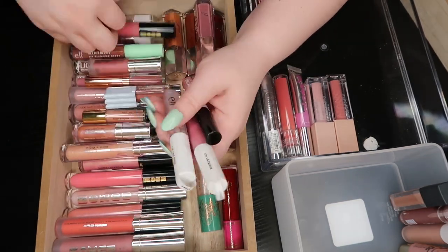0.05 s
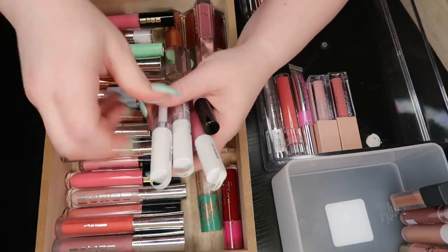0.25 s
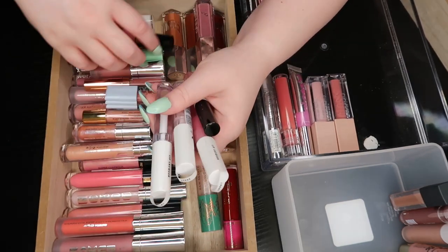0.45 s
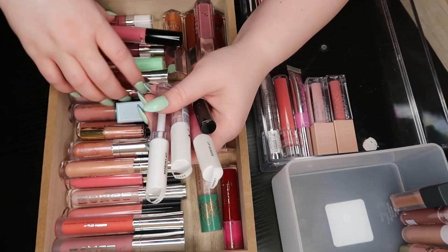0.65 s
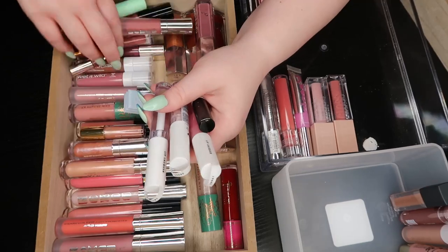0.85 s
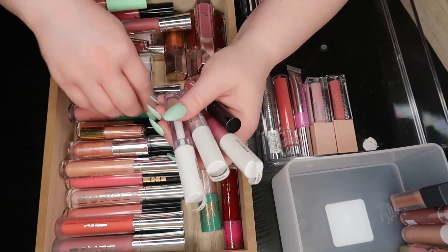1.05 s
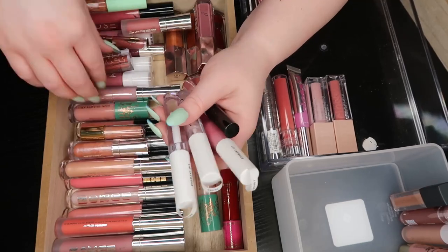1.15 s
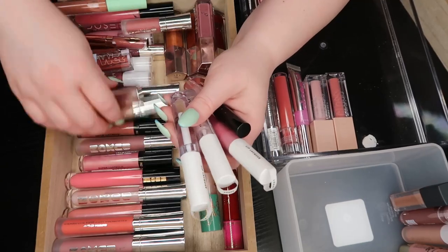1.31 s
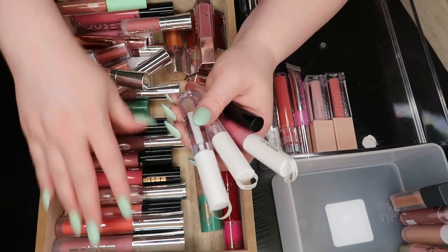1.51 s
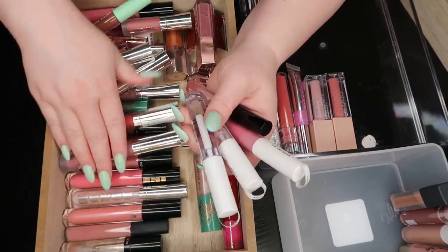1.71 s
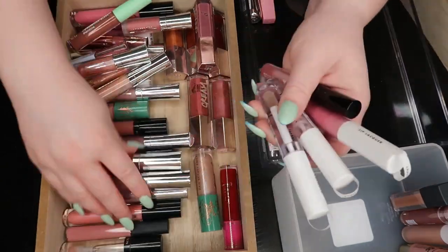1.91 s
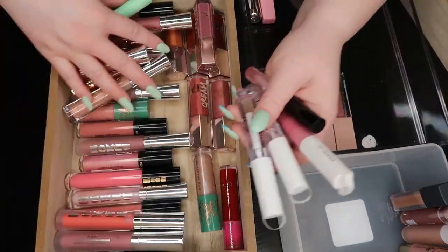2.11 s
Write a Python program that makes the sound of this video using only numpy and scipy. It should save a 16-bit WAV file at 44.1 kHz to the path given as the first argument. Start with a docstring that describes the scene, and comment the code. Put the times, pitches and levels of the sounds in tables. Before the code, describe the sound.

Close up in a small room, plastic lip gloss tubes clack against each other and a wooden drawer. The bright clicks start sparse, then come in uneven bursts with short slides between them, while a low electrical hum lies underneath.

```python
"""In a small room, close to the microphone, hands rummage through a wooden drawer of plastic lip gloss tubes.
Each impact excites damped modes: a bright tick, a few milliseconds of ring in a tube's wall and a knock
on the drawer. Between impacts the tubes slide and scrape by stick-slip friction, and now and then a loose
one rings on. A wavering electrical hum and a faint rumble lie underneath."""
import sys
import numpy as np
from scipy import signal
from scipy.fft import rfft, irfft, next_fast_len
from scipy.io import wavfile
from scipy.ndimage import uniform_filter1d

SR = 44100
rng = np.random.default_rng(int(sys.argv[2]) if len(sys.argv) > 2 else 0)


def to_wav(s):
    """Save 16-bit WAV."""
    ch = np.atleast_2d(s).T  # columns
    pcm = np.round(np.clip(ch, -1, 1) * 32767)  # PCM
    wavfile.write(sys.argv[1], SR, pcm.astype(np.int16))


N = 95608


def clacks():
    """Inelastic collision: each impact is followed by a weaker rebound from the same spot."""
    # (time [s], knock level [dB], tube level [dB], tick level [dB], tube pitch [Hz], tick pitch [Hz])
    impacts = [(0.0282, -33, -29, -33, 6500, 14200), (0.0411, -30, -26.5, -31.5, 4800, 9600),
               (0.0448, -30, -24.5, -29.5, 4320, 9200), (0.0622, -37, -34, -38, 4380, 8800),
               (0.107, -32, -26.5, -35.5, 4300, 9200), (0.1503, -71, -38, -21, 6770, 14200),
               (0.2037, -67, -49, -43, 5700, 9700), (0.2256, -45, -38, -50, 3720, 11000),
               (0.277, -46.5, -38.5, -52, 3800, 9200), (0.339, -61, -37, -35, 4480, 11100),
               (0.4028, -30.5, -34, -40, 3480, 13600), (0.4089, -40, -31.5, -38, 4300, 9500),
               (0.4346, -29.5, -32.5, -32, 4100, 9200), (0.4447, -44, -35, -31, 4080, 9300),
               (0.4597, -44, -33, -29.5, 6340, 10700), (0.4638, -31.5, -29, -29.5, 4300, 8500),
               (0.4834, -38, -31.5, -41, 5250, 8800), (0.5354, -35, -33, -34, 4230, 8900),
               (0.5407, -30, -29.5, -34, 5760, 8600), (0.552, -29, -26.5, -39, 5240, 12500),
               (0.5603, -27.5, -31, -28, 6100, 10800), (0.5728, -43, -45, -33, 5660, 13000),
               (0.5848, -37, -33, -45, 4200, 10400), (0.5864, -38, -26, -43, 6160, 10400),
               (0.5943, -20.5, -20, -13, 4670, 12100), (0.6312, -36, -38, -37, 4300, 9600),
               (0.636, -45, -31, -45, 5270, 13700), (0.64, -24.5, -32, -40, 5200, 10700),
               (0.659, -20, -18, -21.5, 4300, 13600), (0.6642, -23.5, -20, -21, 4230, 14300),
               (0.6746, -30, -25, -42, 3140, 13600), (0.7081, -23.5, -20.5, -24.5, 5570, 10400),
               (0.7145, -22.5, -29, -33, 3570, 10200), (0.7213, -29, -25, -18, 5000, 13600),
               (0.7256, -21.5, -19, -18, 6140, 13700), (0.729, -23, -20, -24, 4400, 9700),
               (0.7305, -38, -19, -31, 5300, 10000), (0.751, -32, -25.5, -23.5, 6800, 10900),
               (0.768, -28, -28, -26, 5440, 10500), (0.7764, -26, -19.5, -23.5, 4080, 9000),
               (0.8125, -22, -16, -18, 4520, 9000), (0.8147, -22, -22, -37, 4370, 9200),
               (0.8219, -24.5, -23, -39, 4550, 9200), (0.8255, -28, -18, -31, 7100, 9200),
               (0.839, -25, -16, -22, 7050, 9800), (0.863, -37, -26.5, -31, 4800, 10900),
               (0.8818, -35, -24, -33, 5170, 10200), (0.8889, -26.5, -17, -22.5, 4410, 9100),
               (0.947, -36, -31, -49, 5070, 9600), (0.9682, -27, -38, -39, 4200, 10100),
               (0.9803, -30, -42, -49, 4400, 9200), (1.0076, -41, -38.5, -31.5, 6260, 14600),
               (1.0464, -27, -26, -44, 4370, 9100), (1.0514, -42, -57, -31, 4260, 9500),
               (1.1003, -27.5, -21, -29, 5450, 9300), (1.1045, -29, -23, -41, 4700, 10600),
               (1.1086, -23.5, -21, -24.5, 6540, 8500), (1.1142, -27, -17, -26, 4460, 10100),
               (1.2028, -38.5, -47, -43, 4400, 13900), (1.2306, -32.5, -27.5, -36, 3560, 9000),
               (1.2589, -24, -24, -33, 4160, 10100), (1.2696, -26.5, -19, -19.5, 4080, 9300),
               (1.293, -15.5, -14, -30, 4250, 10300), (1.2983, -23.5, -16.5, -18.5, 4340, 9700),
               (1.3077, -16.5, -12.5, -20, 4215, 8700), (1.3115, -36, -19, -24, 4300, 15000),
               (1.3221, -38, -25, -33, 5250, 8900), (1.328, -49, -30, -29, 5400, 9000),
               (1.341, -57, -29.5, -33, 6100, 8650), (1.3697, -39, -30, -42, 4750, 9500),
               (1.3902, -30.5, -33, -32.5, 4370, 13300), (1.4459, -40, -38.5, -43.5, 5570, 9400),
               (1.4687, -41, -43.5, -62, 3400, 9300), (1.5312, -49, -42, -34, 6500, 13400),
               (1.5353, -30.5, -27, -38, 3200, 11300), (1.5488, -37.5, -29, -39, 5900, 8800),
               (1.5628, -24.5, -17, -36, 5150, 9000), (1.5764, -20, -17, -14, 4950, 9500),
               (1.5855, -24, -18, -19, 5560, 9800), (1.6079, -25.5, -18.5, -18.5, 5800, 9500),
               (1.6106, -21.5, -17.5, -17.5, 5240, 9700), (1.6298, -26, -16.5, -17.5, 5700, 9500),
               (1.638, -44, -28, -26, 5300, 9300), (1.6419, -17, -31, -27, 6140, 10700),
               (1.6465, -18.5, -21, -18, 4240, 9500), (1.65, -31, -17.5, -19, 4900, 12800),
               (1.657, -36, -17, -16.5, 7670, 12400), (1.6612, -20, -14.5, -25, 6230, 10100),
               (1.666, -19.5, -19, -25, 5150, 9800), (1.669, -32, -18, -27, 4130, 10500),
               (1.6741, -46, -22, -30, 7000, 9000), (1.6847, -43, -26, -54, 3670, 9900),
               (1.6896, -23, -14, -21, 4090, 9500), (1.7022, -30, -22, -32, 6420, 10800),
               (1.7269, -33, -37, -54, 6100, 8800), (1.7309, -43, -28.5, -36.5, 5540, 9100),
               (1.8213, -32.5, -33, -51, 3740, 9400), (1.8315, -27.5, -22, -47, 3780, 8700),
               (1.844, -31, -19.5, -34, 6270, 10000), (1.8541, -25.5, -16, -17, 4000, 9100),
               (1.8745, -24, -20.5, -19, 3600, 9200), (1.8787, -26.5, -24, -37, 3380, 9600),
               (1.8931, -27, -27, -25, 6600, 9700), (1.9021, -26, -24, -19, 5300, 8540),
               (1.9175, -21.5, -23.5, -21, 4160, 8500), (1.9202, -22, -22, -22, 5000, 9500),
               (1.9233, -35, -21.5, -24, 3670, 10300), (1.952, -21.5, -27, -21, 5050, 11000),
               (1.9558, -22, -19, -17.5, 6460, 14000), (1.9743, -27, -22, -28, 5470, 9200),
               (1.979, -24.5, -19, -33, 3980, 9200), (1.9841, -23, -20, -25, 4920, 9000),
               (1.9933, -26.5, -19, -27, 4400, 11200), (2.0065, -28, -19, -36, 4730, 9600),
               (2.0173, -29.5, -33, -33, 4670, 10200), (2.0267, -30, -31.5, -38, 5200, 9550),
               (2.0405, -37, -32.5, -44, 4600, 9500), (2.1133, -46.5, -33.5, -43, 6730, 10700),
               (2.1312, -42, -36.5, -40, 5150, 12800), (2.1501, -45, -42, -31, 5300, 13600),
               (2.1551, -36, -30, -42, 3930, 10000), (2.1599, -29, -23, -31.5, 5240, 9700)]
    # resonances of the drawer (frequency [Hz], relative level [dB], T60 [s])
    drawer_modes = [(444.7, -13, 0.19), (824, -11.5, 0.073), (878, -5.5, 0.044), (967, -7.5, 0.046),
                    (1018, -3, 0.019), (1266, -3.5, 0.039), (1327, -4.5, 0.026), (1558, 2, 0.03),
                    (1905, -13, 0.081), (2156, -4, 0.033), (2310, -5.5, 0.067)]
    # the knock's low band, light on the pile, fuller on the wood (time [s], relative gain [dB])
    knock_body = [(.1, 1), (.82, -4), (1.3, 0), (1.9, 3.5)]
    t = np.arange(SR // 14) / SR
    out = np.zeros(N + SR)
    modes = np.array([undb(db) * ring(t, hz, t60) for hz, db, t60 in drawer_modes])
    for (at, *blow), path in zip(impacts, room_paths(len(impacts))):
        body_db = np.interp(at, *np.array(knock_body).T)
        sound = np.pad(contact(t, modes, body_db, *blow), (0, len(t)))
        gap_s = rng.uniform(0.0018, 0.005)
        rebound_db = rng.uniform(-11.44, -9)
        add(sound, undb(rebound_db) * contact(t, modes, body_db, *blow), gap_s)
        add(out, signal.fftconvolve(sound, path), at)
    return out[:N]


def contact(t, modes, body_db, knock_db, tube_db, tick_db, tube_hz, tick_hz):
    """Impulse excitation: one blow sounds the drawer, a tube's wall and a bright tick together."""
    # spectra of the three bursts (frequency [Hz], relative level [dB])
    knock_spectrum = [(90, -23), (200, -26.5), (320, -5), (430, -7.5), (620, -6.5), (950, -0.5), (1500, -1),
                      (2000, -2.5), (2600, -7), (4000, -23.5)]
    tube_spectrum = [(1500, -40), (2500, -7.5), (4200, 1.5), (5600, 0.5), (7200, -8), (9500, -17)]
    tick_spectrum = [(4500, -40), (6500, 6), (8000, -4), (9600, 5), (12000, 0.5), (15500, -5.5)]
    wood = unit(rng.choice([-1., 1.], len(modes)) @ modes)
    knock = crack(t, knock_spectrum, t60=0.018) + wood
    knock = colour(knock, [(1040, body_db), (1650, 0)])  # low shelf
    tube = crack(t, tube_spectrum, t60=0.011) + undb(-2) * ring(t, tube_hz, t60=0.01)
    tube *= 1 - np.exp(-t / 0.00016)  # attack
    tick = crack(t, tick_spectrum, t60=0.0072) + ring(t, tick_hz, t60=0.002)
    return strike(knock, knock_db) + strike(tube, tube_db) + strike(tick, tick_db)


def crack(t, spectrum, t60):
    """Modal overlap: many close, heavily damped modes merge into a burst of coloured noise."""
    return unit(colour(rng.choice([-1., 1.], len(t)) * fade(t, t60), spectrum))


def ring(t, hz, t60):
    """Damped oscillation of a single mode."""
    return unit(np.sin(2 * np.pi * hz * t) * fade(t, t60))


def clinks():
    """Free vibration: a loose tube holds a shimmering note."""
    # (time [s], pitch [Hz], level [dB], T60 [s])
    notes = [(.1505, 5180, -28.5, 0.024), (.1505, 13500, -32, 0.095), (0.338, 1880, -42, 0.058),
             (0.594, 12250, -24, 0.05), (.84, 7100, -30, .04), (1.008, 14400, -36, .045),
             (1.699, 4680, -50.5, 0.74), (1.985, 5220, -10.5, 0.017), (1.992, 5470, -13, 0.022)]
    t = np.arange(SR // 2) / SR
    out = np.zeros(N + SR)
    for at, hz, db, t60 in notes:
        add(out, undb(db) * cluster(t, hz, t60), at)
    return out[:N]


def cluster(t, hz, t60, count=9, spread=0.022):
    """Beating: close modes of a tube and its cap interfere as they fade together."""
    mode_hz = hz * (1 + spread * rng.standard_normal((count, 1)))
    phase = rng.random((count, 1))
    tones = np.sin(2 * np.pi * (mode_hz * t + phase)).sum(axis=0)
    decay = fade(t, t60)
    return unit(tones * decay) * np.sqrt(np.sum(decay ** 2) / 2)  # energy of one decaying sine


def sliding():
    """Stick-slip friction: tubes catch and slip on each other."""
    # envelope (time [s], level [dB])
    slide_levels = [(0, -32.5), (.055, -47.5), (.09, -60), (.3, -60), (.37, -46), (.405, -45), (.51, -48.5),
                    (.55, -32.5), (.61, -38), (.69, -39.5), (.73, -32.5), (.79, -39), (.85, -37),
                    (.93, -52), (0.989, -42.5), (1.09, -52.5), (1.12, -54), (1.18, -61), (1.24, -46),
                    (1.33, -40), (1.41, -41), (1.44, -57), (1.52, -58), (1.58, -31), (1.67, -36),
                    (1.76, -55), (1.81, -50.5), (1.85, -35), (2.01, -41), (2.08, -65), (2.11, -54),
                    (2.165, -36)]
    # (frequency [Hz], relative level [dB])
    slide_spectrum = [(200, -0.5), (500, 2.5), (1000, -1), (1500, 0.5), (2700, -7.5), (4300, -2.5),
                      (6000, -6.5), (8000, -12), (16000, -19)]
    rub = colour(slips(), slide_spectrum)
    level_db = np.interp(np.arange(N) / SR, *np.array(slide_levels).T)
    return rub / rub.std() * undb(level_db)


def scrapes():
    """Friction noise: a cap or nail dragged along a tube gives a rasp that swells and dies away."""
    # (time [s], duration [s], level [dB])
    strokes = [(0, 0.018, -29.5), (0.528, 0.04, -36), (0.713, 0.044, -28), (1.258, .016, -35),
               (1.316, 0.047, -37), (1.386, 0.035, -34), (1.637, 0.038, -24), (1.86, 0.045, -36),
               (1.95, 0.035, -33)]
    # (frequency [Hz], relative level [dB])
    rasp_spectrum = [(600, -13), (2200, 2), (5200, 5), (11000, -5), (15000, -10)]
    t = np.arange(N) / SR
    press = sum(undb(db) * np.sin(np.pi * np.clip((t - at) / length, 0, 1)) for at, length, db in strokes)
    rasp = colour(slips(), rasp_spectrum)
    return rasp / rasp.std() * press


def slips(per_second=2600, spread_db=5):
    """Shot noise: tiny clicks of uneven size at random moments."""
    sizes = undb(spread_db * np.minimum(rng.exponential(size=N), 3))
    return (rng.random(N) < per_second / SR) * sizes * rng.choice([-1., 1.], N)


def room_paths(count, sides_delay_s=0.0022, room_delay_s=0.005):
    """Impulse responses, one per spot: direct sound, reflections off the drawer's sides, reverberation."""
    # reverberation (frequency [Hz], level against the direct sound [dB])
    room_spectrum = [(200, -8.5), (1000, -7.5), (2500, -9), (5000, -13.5), (9000, -12.5), (15000, -16)]
    # (frequency [Hz], T60 [s])
    room_decay = [(250, 0.51), (900, 0.093), (2200, 0.15), (5500, 0.11), (14000, 0.12)]
    t = np.arange(SR // 5) / SR
    white = rng.standard_normal((count, 2, len(t)))
    hz = np.fft.rfftfreq(len(t), 1 / SR)
    diffuse = rfft(white[:, 0]) * undb(on_log(hz, room_spectrum))
    out = undb(-13) * white[:, 1] * unit(fade(t, t60=0.028) * (t > sides_delay_s))
    for k, (_, t60) in enumerate(room_decay):
        band = on_log(hz, [(f, float(j == k)) for j, (f, _) in enumerate(room_decay)])
        out += irfft(diffuse * band, len(t)) * unit(fade(t, t60) * (t > room_delay_s))
    out[:, 0] += 1  # direct sound
    return out


def hum(hz=179.7, level_db=-33.5, waver_hz=6.8, waver_db=1.5):
    """Amplitude and phase modulation: an electrical hum wavers slightly."""
    t = np.arange(N) / SR
    waver = np.cos(2 * np.pi * waver_hz * (t - 0.03) + 0.5 * walk(2.1)) + 0.15 * walk(19.5)
    tone = np.sqrt(2) * np.sin(2 * np.pi * hz * t + 0.079 * walk(7.6))
    return tone * undb(level_db + waver_db * waver)


def air():
    """Broadband ambient noise: a soft rumble with a trace of hiss."""
    # (frequency [Hz], relative level [dB])
    air_spectrum = [(15, -3.5), (35, 1.5), (55, -3), (85, -13), (150, -9.5), (240, -17), (400, -19.5),
                    (800, -30), (1200, -35), (4000, -49.5), (8000, -62), (16000, -46)]
    noise = colour(rng.standard_normal(N), air_spectrum)
    return undb(-42) * noise / noise.std()


def undb(db):
    """Decibels to gain."""
    return 10 ** (np.asarray(db) / 20)


def unit(x):
    """Scale to an energy of one."""
    return x / np.sqrt(np.sum(x ** 2))


def strike(x, db):
    """Set the rms level of the first three milliseconds."""
    return x * undb(db) / np.sqrt(np.mean(x[:132] ** 2))


def on_log(hz, points):
    """Interpolate (frequency [Hz], value) points on a log-frequency axis."""
    f, v = np.array(points).T
    return np.interp(np.log(np.maximum(hz, 1)), np.log(f), v)


def colour(x, points):
    """Minimum-phase filter with the response (frequency [Hz], gain [dB])."""
    size = next_fast_len(len(x) + 2048) * 2
    gain = undb(on_log(np.fft.rfftfreq(size, 1 / SR), points))
    cepstrum = irfft(np.log(gain))
    cepstrum[1:size // 2] *= 2  # folding onto positive time makes it causal
    cepstrum[size // 2 + 1:] = 0
    return irfft(rfft(x, size) * np.exp(rfft(cepstrum)))[:len(x)]


def fade(t, t60):
    """Exponential decay, 60 dB in t60 seconds."""
    return np.exp(-np.log(1000) * t / t60)


def walk(rate_hz):
    """Smooth random wandering with a spread of one."""
    k = int(SR / rate_hz)
    steps = np.repeat(rng.standard_normal(N // k + 1), k)
    smooth = uniform_filter1d(uniform_filter1d(steps, k), k)[:N]
    return smooth / smooth.std()


def add(out, x, at):
    """Mix x into out from a time on."""
    i = max(int(at * SR), 0)
    out[i:i + len(x)] += x


def scene():
    """Superposition: the tubes in their room, over hum and air."""
    rubbing = signal.fftconvolve(sliding() + scrapes(), room_paths(count=1)[0])[:N]
    return (clacks() + clinks() + rubbing + hum() + air())[None]


def record(dry, cutoff_hz=15900):
    """Clipping at full scale, then a steep low-pass."""
    lowpass = signal.ellip(8, 0.2, 70, cutoff_hz, fs=SR, output="sos")
    return signal.sosfilt(lowpass, np.clip(dry, -1, 1))


dry = scene()
out = record(dry)
to_wav(out)
```